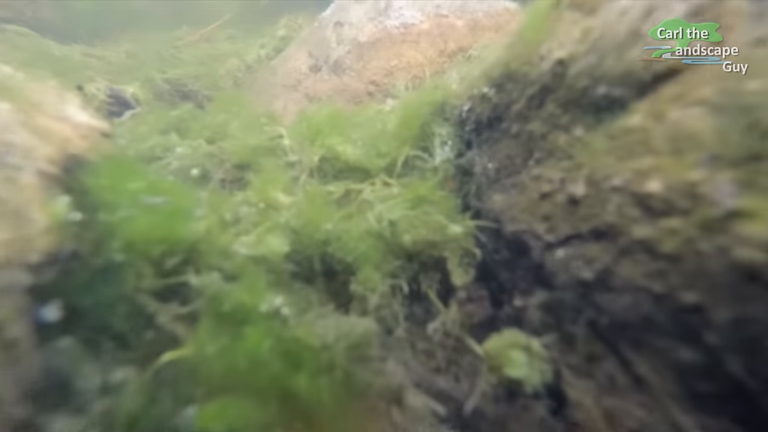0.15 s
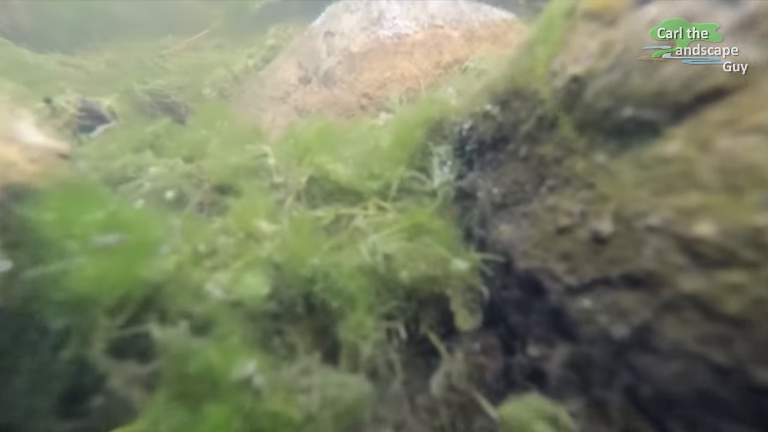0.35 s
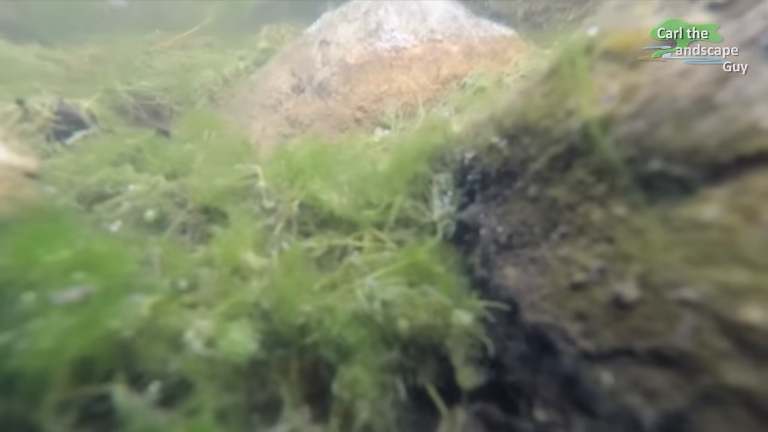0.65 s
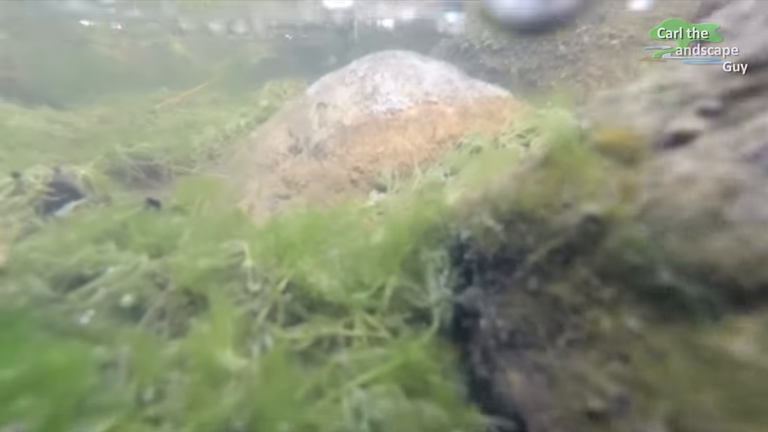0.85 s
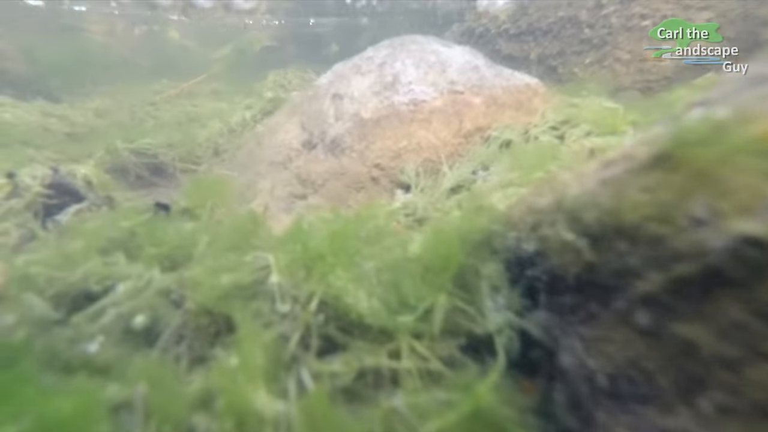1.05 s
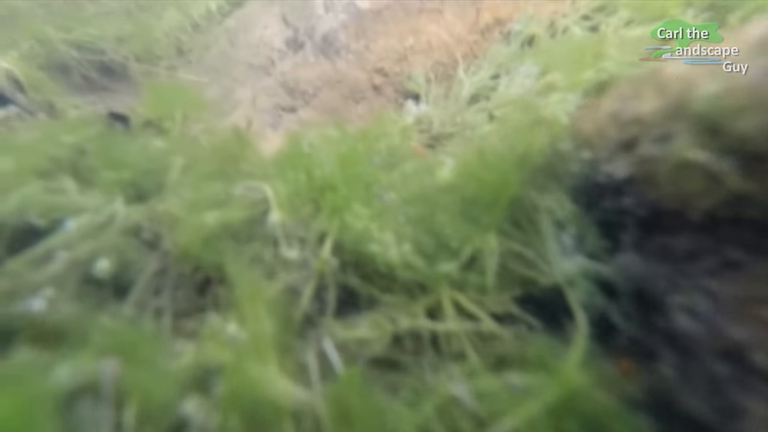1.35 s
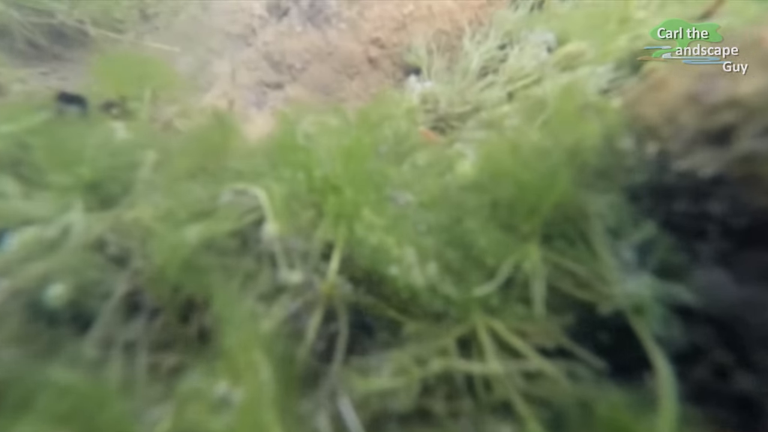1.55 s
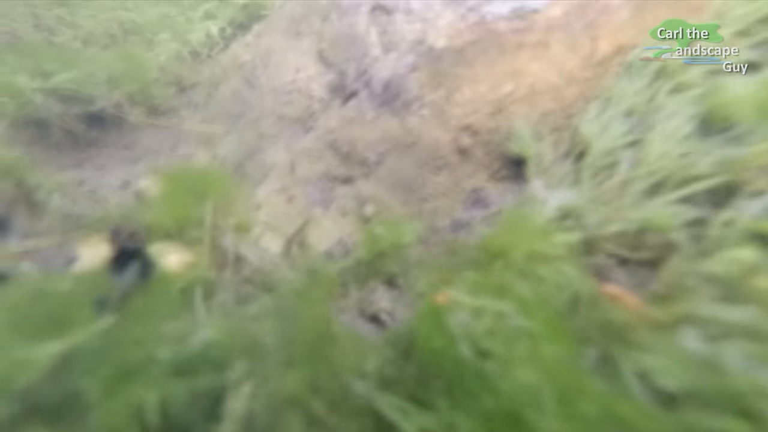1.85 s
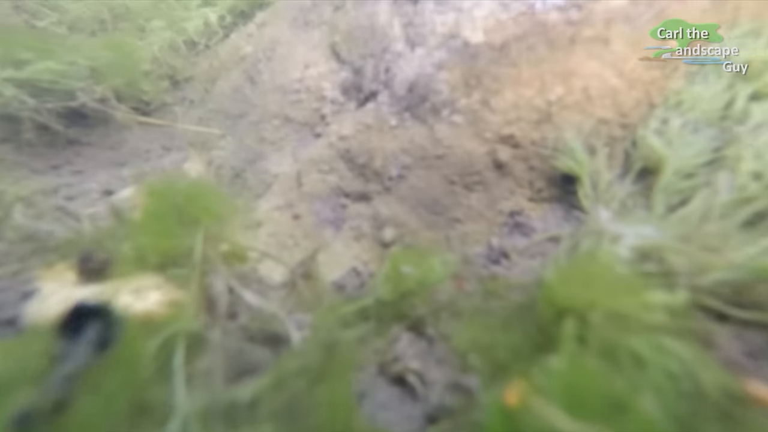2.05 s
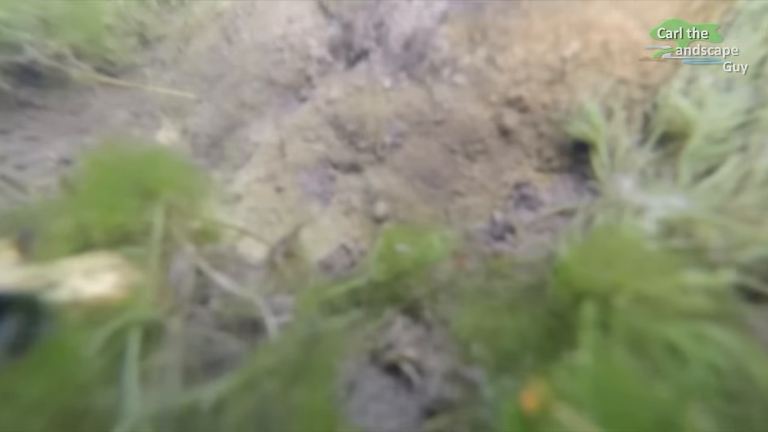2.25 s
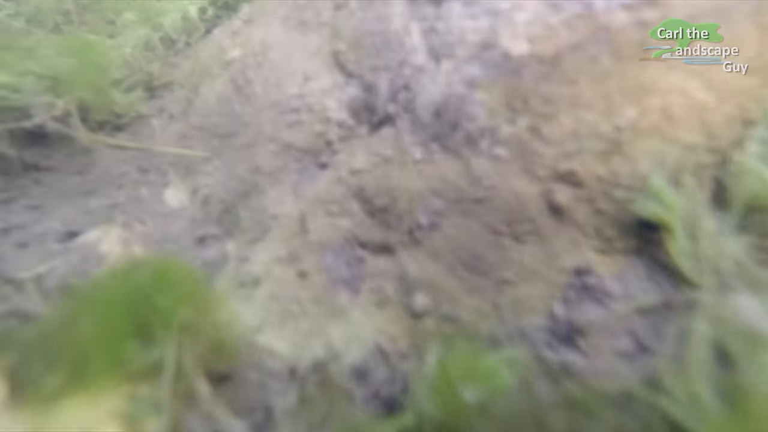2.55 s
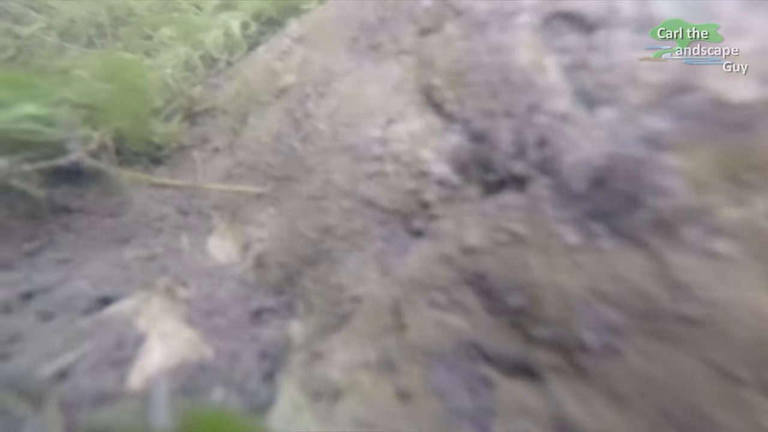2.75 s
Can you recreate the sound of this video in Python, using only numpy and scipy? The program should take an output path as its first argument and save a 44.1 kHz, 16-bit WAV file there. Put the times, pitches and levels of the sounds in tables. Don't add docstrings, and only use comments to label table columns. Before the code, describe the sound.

Muffled underwater scraping and thuds on a camera housing, with small bubbles and stream wash

```python
import sys
import numpy as np
from scipy import signal
from scipy.io import wavfile
from scipy.ndimage import uniform_filter1d

SR = 44100
rng = np.random.default_rng(int(sys.argv[2]) if len(sys.argv) > 2 else 0)


def transcribe(signal):
    frames = np.atleast_2d(signal).T
    limited = np.clip(frames, -1, 1)
    pcm = np.round(limited * 32767).astype(np.int16)
    wavfile.write(sys.argv[1], SR, pcm)


def ratio(d):
    e = np.asarray(d, float) / 20
    return 10 ** e


N = 127890
T = np.arange(N) / SR
BUBBLE_T60_S, BUBBLE_RISE_S, BUBBLE_GLIDE = 0.03, 0.00042, 0.044


def noise():
    return rng.standard_normal(N)


def evened(x):
    return x / np.sqrt(np.mean(x ** 2) + 1e-20)


def add(mix, s, sound):
    part = mix[round(s * SR):][:len(sound)]
    part += sound[:len(part)]


def curve(points):
    return ratio(np.interp(T, *np.transpose(points)))


def colour(x, points):
    f, db = np.transpose(points)
    hz = np.abs(np.fft.fftfreq(8192, 1 / SR)) + 1
    octaves_out = np.maximum(np.log2(f[0] / hz), 0) + np.maximum(np.log2(hz / f[-1]), 0)
    level = np.interp(np.log(hz), np.log(f), db) - 40 * octaves_out
    log = np.log(ratio(np.maximum(level, -110)))
    taps = np.fft.ifft(np.exp(log - 1j * signal.hilbert(log).imag)).real[:4096]
    return evened(signal.oaconvolve(x, taps)[:N])


def patchy(x, db):
    z = signal.stft(x, nperseg=256)[2]
    field = uniform_filter1d(rng.standard_normal(z.shape), size=5, axis=0)
    field = uniform_filter1d(field, size=8, axis=1)
    return evened(signal.istft(z * ratio(db * evened(field)), nperseg=256)[1][:N])


def wander(db):
    return ratio(db * evened(uniform_filter1d(noise(), size=300)))


def grains(per_s, spread_db, bed):
    size = ratio(spread_db * np.minimum(rng.exponential(1, N), 4)) * rng.choice([-1., 1.], N)
    clicks = size * (rng.random(N) < per_s / SR)
    return evened(clicks) + bed * noise()


def ring(hz, t60, rise, glide=0):
    t = np.arange(round(t60 * SR)) / SR
    fade = (1 - np.exp(-t / rise)) * ratio(-60 * t / t60)
    return fade * np.sin(2 * np.pi * hz * t * (1 + glide * t / t60))


def knock(hz):
    turns = np.arange(8000) / SR * hz
    pitch = hz * (1 + 2.3 * hz / 150 * np.exp(-turns / 0.41))
    fade = ratio(-60 * turns / 6.73) * (1 - np.exp(-turns / 0.26))
    return -fade * np.sin(2 * np.pi * np.cumsum(pitch) / SR)


# f/Hz, level/dB per Hz
HISS_TONE = [(1800, 2), (4500, -7), (6800, -14.5), (12000, -21.5)]
# t/s, level/dB
HISS_LOUDNESS = [(0, -72), (.35, -80), (1.75, -78), (1.85, -88), (2.9, -84)]


def hiss():
    return curve(HISS_LOUDNESS) * patchy(colour(grains(620, 3.6, 0.9), HISS_TONE), db=4.0)


# f/Hz, level/dB per Hz
CRACKLE_TONE = [(6000, -11.5), (7100, -4.5), (8800, -8.5), (10500, -17.5)]
# t/s, level/dB
CRACKLE_LOUDNESS = [(0, -88.5), (.7, -82), (.76, -86), (1.18, -64.5), (1.24, -87), (1.75, -99), (1.82, -94),
                    (2.5, -92.5), (2.9, -84)]
# t/s, f/Hz
CRACKLE_FLOOR = [(1.0, 6450), (1.2, 7240), (2.5, 6750), (2.9, 7940)]


def crackle(flicker):
    pops = colour(grains(600, 2.5, 0.96) * flicker, CRACKLE_TONE)
    f, t, z = signal.stft(pops, SR, nperseg=512)
    floor_hz = np.interp(t, *np.transpose(CRACKLE_FLOOR))
    below = np.clip((floor_hz - f[:, None]) / 200., 0, 1)
    pops = signal.istft(z * ratio(-25 * below), SR, nperseg=512)[1][:N]
    return curve(CRACKLE_LOUDNESS) * pops


def surge(push):
    low = colour(noise(), [(23.2, 0), (52.4, -2)])
    pushed = np.abs(uniform_filter1d(push, size=2000))
    steady_db, follow_db = -53, -6
    return np.sqrt(ratio(2 * steady_db) + ratio(2 * follow_db) * pushed) * low


def small_bubbles():
    small = np.zeros(N)
    for hz in np.geomspace(1154, 1900, num=16):
        bubble = ring(hz, BUBBLE_T60_S, BUBBLE_RISE_S, BUBBLE_GLIDE)
        small += signal.oaconvolve(grains(160 / 16, 2.5, 0), bubble)[:N]
    return evened(small)


# t/s, peak level/dB, f/Hz
BUBBLE_EVENTS = [(0.4738, -33.5, 2230), (1.0909, -41.5, 2200), (1.3994, -37.5, 2080), (1.4504, -37, 1643),
                 (1.5249, -37, 1193), (1.8053, -45.5, 1920), (1.8352, -50, 1870), (1.895, -51, 1800),
                 (1.925, -36, 1110), (2.1005, -48.5, 1870), (2.1268, -53.5, 1300), (2.4372, -53.5, 1960),
                 (2.5735, -51, 1844), (2.6222, -48, 1815), (2.7237, -52.5, 1570), (2.7546, -51.5, 1620),
                 (.0558, -61, 1710), (.1156, -59, 1485), (.135, -54, 1900), (.2758, -48.5, 1374),
                 (.38, -61, 1580), (.4, -53, 1830), (.413, -47.5, 1590), (.425, -50, 1770),
                 (.5082, -48, 2000), (.8604, -48.5, 2040), (.9198, -54.5, 1800), (.9687, -54.5, 1890),
                 (1.038, -51, 1944), (1.067, -50, 1920), (1.2795, -42.5, 2140), (1.7529, -48.5, 1880),
                 (1.8667, -61, 1280), (1.941, -44, 1206), (1.958, -41, 1155), (2.0403, -57.5, 1900),
                 (2.171, -47, 2090), (2.2523, -53, 1230), (2.2742, -49, 1156), (2.4074, -57.5, 1750),
                 (2.4683, -53, 1240), (2.489, -48, 1120), (2.525, -50.5, 1124), (2.553, -52, 1050),
                 (2.6005, -71, 1380), (2.7053, -56.5, 1570), (2.79, -65, 1700), (2.826, -78, 1710),
                 (2.883, -76, 1420)]


def bubbles():
    out = np.zeros(N)
    for s, db, hz in BUBBLE_EVENTS:
        peak = np.sqrt(2) * ratio(db)
        add(out, s, peak * ring(hz, BUBBLE_T60_S, BUBBLE_RISE_S, BUBBLE_GLIDE))
        add(out, s, peak * ratio(-2) * ring(hz * 0.857, BUBBLE_T60_S / 2, BUBBLE_RISE_S))
        add(out, s, peak * ratio(-9.5) * ring(hz * 0.73, BUBBLE_T60_S, BUBBLE_RISE_S / 2))
    return out


# t/s, peak level/dB, first f/Hz
GULP_EVENTS = [
    (.011, -44.5, 2000),
    (0.077, -44, 1400),
    (0.165, -53, 1663),
    (0.5913, -43, 1735),
]


def gulps():
    out = np.zeros(N)
    t60_s, rise_s, sink = 0.05, 0.001, -0.42
    for s, db, hz in GULP_EVENTS:
        add(out, s, ratio(db) * ring(hz, t60_s, rise_s, sink))
        add(out, s, ratio(db) * ring(hz * 0.857, t60_s, rise_s, sink / 2))
    return out


def smear(water):
    tail = ratio(-60 * T[:3000] / 0.026) * rng.standard_normal(3000)
    return ratio(0.5) * signal.oaconvolve(water, tail / np.linalg.norm(tail))[:N]


# t/s, level/dB, top of the muffled band f/Hz
STREAM_COURSE = [(0, -56.5, 1976), (.45, -54.5, 2157), (.9, -59.5, 2130), (1.701, -56, 2220),
                 (1.9, -66, 2090), (2.4, -62.5, 2190), (2.701, -60.5, 2000), (2.9, -64, 1530)]
# f/Hz, level/dB per Hz
WASH_TONE = [(60, -7), (300, -23.5), (1070, -25), (1320, -24), (2100, -20)]


def stream():
    s, db, top_hz = np.transpose(STREAM_COURSE)
    level = ratio(np.interp(T, s, db))
    water = level * ratio(2 - 15) * small_bubbles() + bubbles() + gulps()
    water = water + smear(water)
    water = water + level * patchy(colour(noise(), WASH_TONE), db=1.5)
    f, t, z = signal.stft(water, SR, nperseg=1024, noverlap=768)
    above = np.clip((f[:, None] - np.interp(t, s, top_hz)) / 17.6, -30, 30)
    muffle = ratio(-45 / (1 + np.exp(-above)))
    return signal.istft(z * muffle, SR, nperseg=1024, noverlap=768)[1][:N]


# t/s, peak level/dB, f/Hz
PING_EVENTS = [(.5102, -54, 4600), (.7477, -57, 8000), (.8729, -61, 7450), (.9024, -66, 7400),
               (.9368, -58, 3940), (.9677, -65, 4400), (.9677, -59, 7600), (1.067, -51, 7600),
               (1.0969, -50, 8000), (1.14, -55, 8100), (1.3553, -43.5, 3800), (1.4661, -48.5, 7360),
               (1.525, -55, 7240), (1.5683, -40.5, 4080), (1.9245, -33.5, 3620), (2.1695, -38.5, 3120),
               (2.3565, -52.5, 4020), (2.3704, -59, 3950), (2.393, -73, 3800), (2.5786, -66.5, 7200),
               (2.7222, -69, 8140)]


def pings():
    out = np.zeros(N)
    for s, db, hz in PING_EVENTS:
        for pitch in (hz, hz * 1.09):
            add(out, s, ratio(db) * ring(pitch, 0.011, BUBBLE_RISE_S))
    return out


# start t/s, length/s, level/dB, f/Hz
SQUEAK_EVENTS = [
    (.9, 0.16, -70.5, 4550),
    (.845, .11, -79, 5000),
    (.925, .13, -77, 5750),
    (.85, .18, -79, 6550),
    (2.048, 0.075, -77, 5000),
    (2.475, .03, -75, 5900),
]


def squeaks():
    out = np.zeros(N)
    for s, length, db, hz in SQUEAK_EVENTS:
        t = np.arange(0, length, 1 / SR)
        waver = evened(uniform_filter1d(rng.standard_normal(len(t)), size=500))
        add(out, s, ratio(db) * np.sin(np.pi * t / length) * waver * np.sin(2 * np.pi * hz * t))
    return out


# t/s, peak level/dB
TICK_EVENTS = [(0.123, -54.5), (0.3684, -49.5), (0.4754, -37), (0.65, -38.5), (0.682, -34.5), (0.7247, -46),
               (0.7875, -42), (0.8073, -39), (0.8155, -30), (1.471, -40), (1.9798, -42.5), (2.011, -50),
               (2.0977, -53.5), (2.3572, -52), (2.469, -60), (0.635, -52), (.698, -37.5), (0.825, -44),
               (0.844, -50), (1.0912, -40.5), (2.2682, -52), (1.5245, -35)]


def ticks(rub):
    cracks, t = np.zeros(N), np.arange(1500) / SR
    for s, db in TICK_EVENTS:
        add(cracks, s, ratio(db - 2.5 - 60 * t / 0.012))
    return cracks * colour(rub, [(2300, 11.5), (3900, -3), (5500, -9.0), (9000, -16)])


# t/s, peak level/dB, settled f/Hz
KNOCK_EVENTS = [(0.22, -32, 144.4), (0.2406, -24.5, 133), (.255, -31.5, 159.5), (.268, -37.5, 187),
                (.279, -38.5, 180), (.476, -22.5, 126.8), (.509, -32, 136), (.637, -30, 135.5),
                (0.698, -28.5, 122), (.782, -36.5, 230), (.805, -29.5, 215), (.818, -21, 146),
                (0.941, -29, 73), (1.094, -25, 78), (1.143, -26, 92.6), (1.185, -24, 87.4),
                (1.259, -29.5, 85), (1.531, -23, 38.5), (1.55, -29.5, 42.3), (1.726, -20.5, 48),
                (1.747, -32, 73.6), (1.765, -37.5, 251), (1.921, -32.5, 68.5), (1.972, -27, 40.6),
                (2.171, -28, 90), (2.199, -32.5, 104), (2.231, -28.5, 90.5), (2.249, -34, 116),
                (2.271, -36, 110), (2.283, -33.5, 130), (2.307, -26.5, 86.5), (2.333, -33, 148),
                (2.468, -23, 39.7), (2.517, -37.5, 109), (2.536, -28.5, 47)]


def knocks(rub):
    out, slaps, t = np.zeros(N), np.zeros(N), np.arange(1500) / SR
    for s, db, hz in KNOCK_EVENTS:
        add(out, s, ratio(db + 2.5) * knock(hz))
        slap = ratio(db - 8.5 - 60 * t / 0.02) * np.minimum(t / 0.0012, 1)
        add(slaps, s, slap * (hz / 150) ** 2)
    return out + slaps * colour(rub, [(500, 1.0), (1200, -0.23)])


# start t/s, length/s, push level/dB, grit level/dB, brightness/dB
FIRST_DRAGS = [(0.217, 0.04, -42.5, -101, -4), (0.384, 0.039, -60, -70, -2), (0.466, 0.02, -52, -74, 19.5),
               (0.487, 0.06, -42, -61.5, 7), (0.545, 0.17, -49, -72, 8), (0.628, 0.035, -42, -53.5, 7),
               (0.67, 0.037, -37.5, -53.5, 10.5), (0.707, 0.034, -54, -68, 9),
               (0.741, 0.064, -41.5, -71.5, 13.5), (0.797, 0.032, -33.5, -52.5, 15),
               (0.83, 0.017, -62, -59, 13), (0.855, 0.058, -49, -104, 15), (0.941, 0.15, -45, -71.5, 0),
               (1.08, 0.028, -43, -53, 0.5), (1.101, 0.062, -41.5, -61.5, 1),
               (1.169, 0.039, -45, -51.5, -19), (1.2, 0.054, -42.5, -69, 6)]
# start t/s, length/s, push level/dB, grit level/dB, brightness/dB
LATER_DRAGS = [(1.254, 0.14, -42, -52.5, -3), (1.352, .11, -35, -48, -5), (1.46, 0.084, -35, -48.5, -6),
               (1.554, 0.05, -37.5, -49, -5.5), (1.596, 0.051, -38.5, -57.5, -6.5),
               (1.648, 0.061, -44, -75.5, -30), (1.713, 0.069, -40, -67, 5), (1.92, 0.049, -32.5, -47.5, 7),
               (1.968, 0.05, -52, -63.5, 2.5), (2.158, 0.035, -70, -56, -8),
               (2.192, 0.061, -46.5, -60, -8.5), (2.256, 0.073, -42.5, -55.5, -2.5),
               (2.335, 0.058, -53, -80.5, -1), (2.462, 0.011, -43.5, -59.5, -2),
               (2.479, 0.076, -45, -69.5, 1), (2.52, 0.026, -49, -60.5, 3.5)]


def drag_power():
    push, grit, fizz = np.zeros((3, N))
    for s, length, push_db, grit_db, bright_db in FIRST_DRAGS + LATER_DRAGS:
        rise = np.clip((T - s) / 0.0058, 0, 1)
        late = T - s - length
        gate = rise * np.exp(-np.clip(late / 0.0036, 0, 40))
        push_gate = rise * np.exp(-np.clip(late / 0.0083, 0, 40))
        push += (ratio(push_db) * push_gate) ** 2
        grit += (ratio(grit_db + 4.0) * gate) ** 2
        fizz += (ratio(grit_db + bright_db - 15) * gate) ** 2
    return push, grit, fizz


# f/Hz, level/dB per Hz
PUSH_TONE = [(55, 0.5), (140, -1), (700, -21), (1500, -25)]


def pushes(push):
    lumps = np.zeros(N)
    for hz in np.geomspace(60, 210, num=6):
        lumps += signal.oaconvolve(grains(110 / 6, 1.82, 0), knock(hz))[:N] / np.sqrt(hz)
    shove = colour(grains(300, 2, 1.0), PUSH_TONE) + ratio(1) * evened(lumps)
    return np.sqrt(push) * evened(shove)


def moving_sand():
    clumps = wander(2.2)
    return grains(2500, 1.5, 0.35) * clumps


# f/Hz, level/dB per Hz
GRIT_TONE = [(700, -9), (1420, -12), (1700, 0), (2130, 3.5), (2560, -8.5), (4200, -7.5), (4550, -20.5)]
# f/Hz, level/dB per Hz
FIZZ_TONE = [(4700, 2), (5700, -1), (7800, 0), (9600, -9), (11100, -20), (13500, -69)]


def crunch(sand, grit, fizz):
    coarse = np.sqrt(grit) * patchy(colour(sand, GRIT_TONE), db=-2.0)
    return coarse + np.sqrt(fizz) * patchy(colour(sand, FIZZ_TONE), db=2.0)


def scene():
    push, grit, fizz = drag_power()
    sand = moving_sand()
    drags = pushes(push) + surge(push) + crunch(sand, grit, fizz)
    touches = squeaks() + pings()
    rub = noise()
    touches = touches + ticks(rub) + knocks(rub)
    water = stream()
    flicker = wander(3.0)
    water = water + hiss() + crackle(flicker)
    return (drags + touches + water)[None]


def band_limit(x):
    return signal.sosfilt(signal.butter(12, 12100, fs=SR, output="sos"), x)


def record(dry):
    return band_limit(dry)


dry = scene()
out = record(dry)
transcribe(out)
```